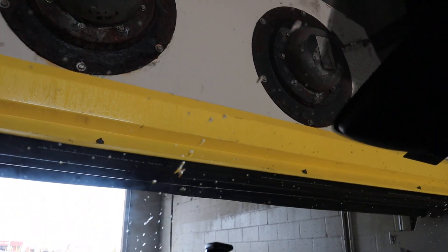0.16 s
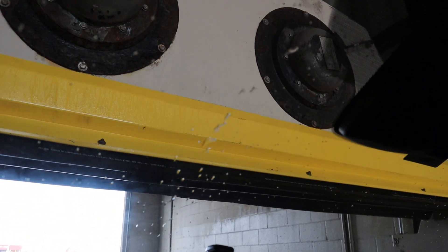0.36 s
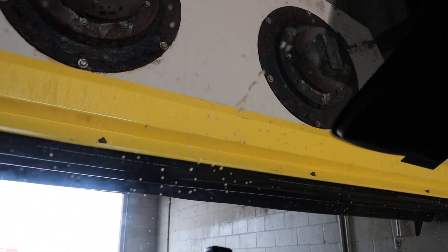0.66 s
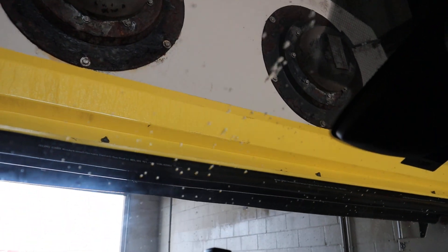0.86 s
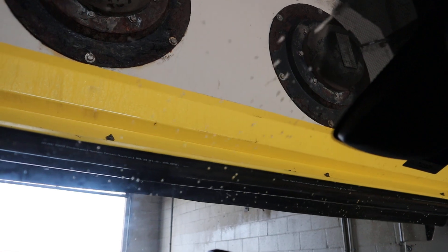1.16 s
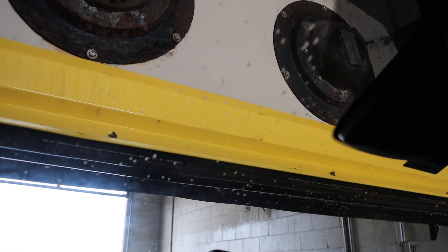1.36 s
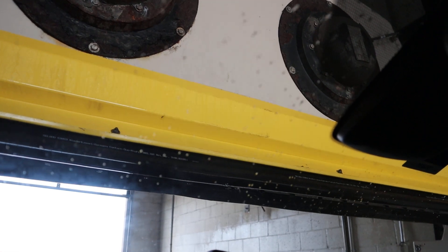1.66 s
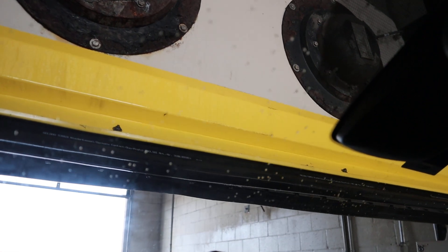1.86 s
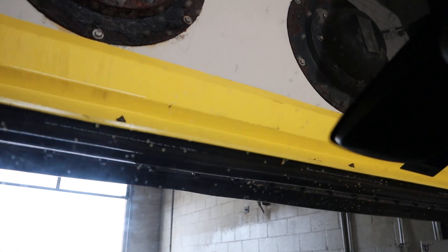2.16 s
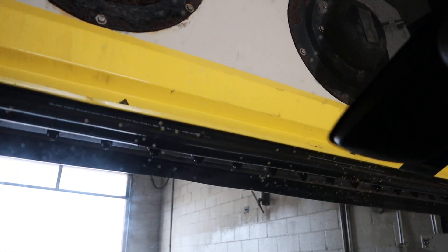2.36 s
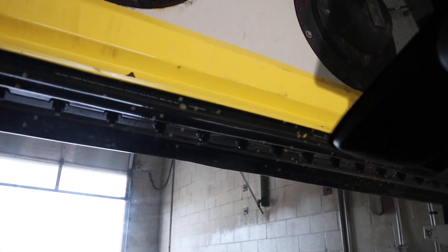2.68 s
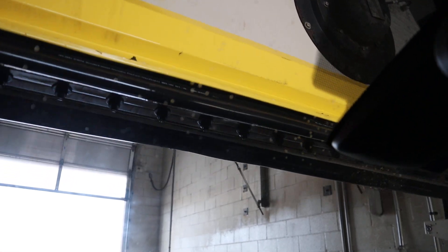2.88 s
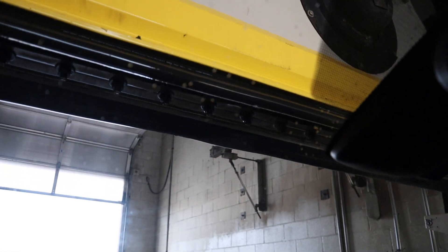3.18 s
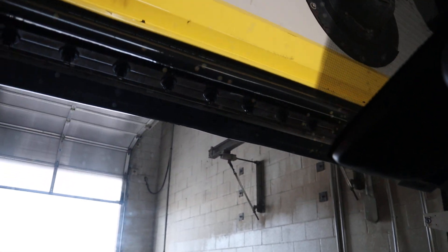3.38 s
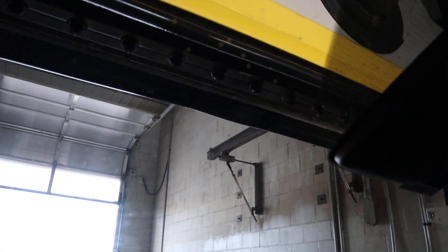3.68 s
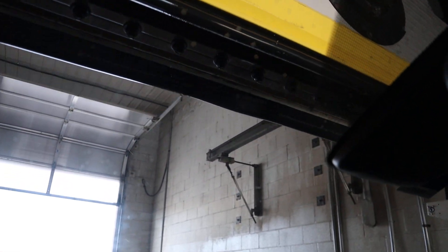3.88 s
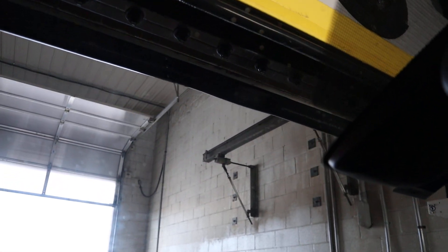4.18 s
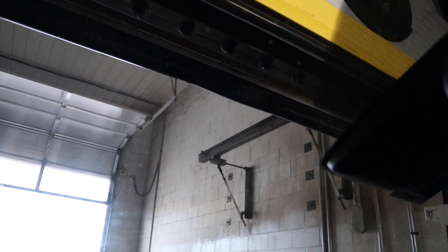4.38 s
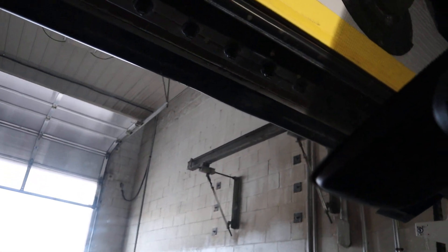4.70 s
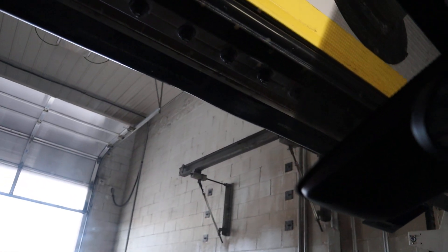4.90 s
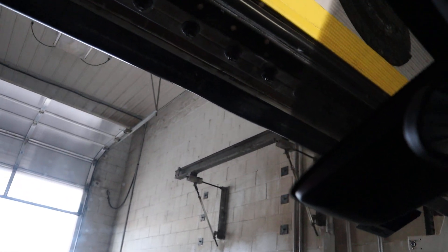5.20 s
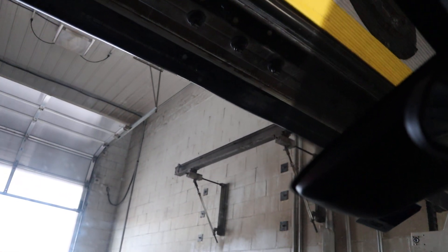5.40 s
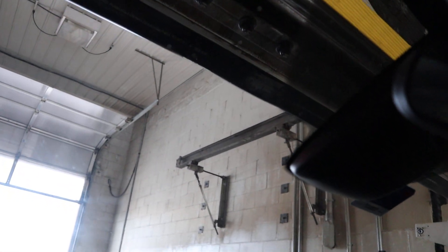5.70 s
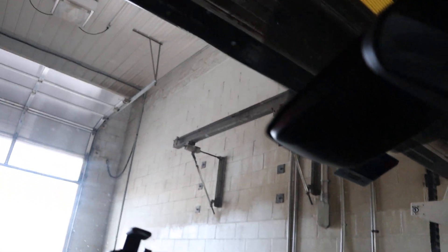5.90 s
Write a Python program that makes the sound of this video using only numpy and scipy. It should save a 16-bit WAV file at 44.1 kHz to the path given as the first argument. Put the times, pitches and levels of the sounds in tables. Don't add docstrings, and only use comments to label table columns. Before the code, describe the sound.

Inside a closed car, powerful wash dryer blowers roar steadily overhead, with low fluttering boom, a faint wavering fan whine and slowly brightening rush.

```python
import sys
import numpy as np
from scipy import signal
from scipy.io import wavfile
from scipy.ndimage import uniform_filter1d

SR = 44100
rng = np.random.default_rng(int(sys.argv[2]) if len(sys.argv) > 2 else 0)


def generate_wav(signal):
    frames = np.transpose(np.atleast_2d(signal))
    scaled = np.clip(frames, -1, 1) * 32767
    pcm = np.round(scaled).astype(np.int16)
    wavfile.write(sys.argv[1], SR, pcm)


def natural_amplitude(level_db):
    exponent = np.asarray(level_db, float) / 20
    return 10 ** exponent


N = 266800

# f/Hz, density/dB per Hz
ALIKE_SPECTRUM = [(18, -58), (32, -42), (90, -30), (160, -29.5), (210, -39), (420, -41.5), (660, -46.5),
                  (1400, -52.5), (2000, -56.5), (2700, -64), (3600, -66), (5500, -77), (7700, -82.5),
                  (13300, -99)]
# f/Hz, density/dB per Hz
OPPOSED_SPECTRUM = [(20, -90.5), (62, -80), (100, -60), (165, -52), (205, -56), (330, -56), (500, -53),
                    (1100, -52.5), (1700, -52.5), (2500, -54.5), (4000, -61.5), (5000, -66.5), (9000, -78),
                    (13300, -98)]
# f/Hz, width/Hz, level/dB
CABIN_MODES = [(45, 13, 3.5), (68.4, 14, 5.5), (122, 45, 5), (169.3, 19, 4), (345, 66, 6), (515, 80, 2),
               (596, 23, 3)]
# f/Hz, width/Hz, level/dB
SIDE_MODES = [(235, 25, 6.5), (280, 50, 11), (540, 70, 5), (745, 60, 2), (940, 90, 0.5), (1100, 110, 2),
              (1400, 60, 0), (1620, 200, 2), (2250, 120, -4)]
# f/Hz, in-step share/1 (+ louder left), quarter-turn share/1 (+ earlier left)
PORT_LINK = [(120, .02, .01), (220, .3, .01), (270, -.1, .01), (420, -.15, .05), (560, .3, -.1),
             (900, -0.18, .3), (1200, 0.32, .15), (1800, 0.23, .25), (2500, .1, .2), (4000, .01, .01),
             (5000, 0.33, -.1), (8000, .1, .01)]
# f/Hz, level/dB
PORT_DULLING = [(8000, -3.7), (8700, -2), (11500, 3), (12300, -1.5), (13300, -5.5)]
# f/Hz, level/dB
ALIKE_DULLING = [(8000, -.3), (9300, -2.6), (10500, -4.8), (11500, -4.4), (13000, -2.5)]
# t/s, travel/1
NOZZLE_TRAVEL = [
    (0, 0),
    (.9, 0),
    (1.8, 0.24),
    (2.6, 0.32),
    (3.4, 0.27),
    (4.4, 0.61),
    (5.2, 0.83),
    (6.05, 1.05),
]
LAYER_HZ = [130, 400, 1300, 4500]
LAYER_TRAVEL_DB = [-1, -1.1, 5, 1.5]
LAYER_GUST_SHARE = [0.79, .25, 0.1, .05]
# t/s, length/s, f/Hz, width/Hz, level/dB
PANEL_PASSES = [(.1, .5, 580, 20, 9), (.15, .4, 500, 60, 3), (.25, .6, 950, 130, 0.5),
                (.7, 0.55, 1000, 90, 2), (1.7, 0.8, 1400, 170, 0), (2.55, 0.65, 578, 20, 4),
                (3.1, .6, 520, 90, -4.5), (3.4, .5, 1410, 140, 4), (3.6, .4, 65, 25, 2.5),
                (4.4, 0.75, 70, 23, 2.5), (4.4, .3, 600, 15, 2), (4.5, .5, 474, 110, 1),
                (4.75, 0.5, 384, 79, 2), (5.38, 0.87, 512, 58, 5.5), (5.75, 0.42, 175, 28, 4.5),
                (5.95, 0.91, 1100, 160, 1), (5.95, 0.57, 280, 62, 8.5)]
# t/s, f/Hz, level/dB
GUSTS = [(.03, 113, -11), (.2, 122, -10.5), (.29, 123, -10), (.53, 125, -11.5), (.86, 122, -9.5),
         (1.04, 122, -16), (1.23, 109.8, -11), (1.51, 117, -13.5), (1.74, 121.5, -18), (1.87, 116.4, -18.5),
         (2.09, 116.5, -6.5), (2.22, 114.2, -10.5), (2.5, 107.9, -13.5), (2.91, 115.6, -18.5),
         (3.22, 123.4, -16), (3.44, 107.5, -16), (3.72, 116, -13), (3.89, 110, -12), (4.12, 115, -15.5),
         (4.4, 118.3, -15.5), (4.52, 123, -11.5), (4.87, 119.5, -7), (5.02, 120.5, -13.5),
         (5.14, 117.3, -15.5), (5.41, 122, -13.5), (5.63, 115.5, -14), (5.8, 119, -11.5),
         (5.92, 118.5, -17.5)]
# f/Hz, alike level/dB, opposed level/dB, in step with first fan at t/s
BLADE_TONES = [(586.61, -39, -51, 0), (586.9, -37, -49, 1.205), (588.4, -43, -55, .262),
               (586.72, -42, -52, 1.242), (587.22, -46, -62, 1.434), (586.13, -47.5, -63, .642)]
# f/Hz, alike level/dB, opposed level/dB, in step with first fan at t/s
SECOND_TONES = [(1176.71, -51, -60, 0), (1176.32, -52.5, -57, 1.699), (1173.57, -52, -68, .165),
                (1173.12, -53.5, -63, .086), (1174.08, -55.5, -70, .282), (1176.05, -59, -62, .49)]
# f/Hz, alike level/dB, opposed level/dB, in step with first fan at t/s
THIRD_TONES = [(1760.35, -55, -52.5, 0), (1759.73, -56.5, -58.5, 1.544), (1761, -60, -55.5, .044),
               (1760.16, -57, -54.5, 2.31), (1759.49, -61, -58, .762), (1762.18, -59, -62, .422)]
WHINE_TRAVEL_DB = [-0.1, 11.5, 0]
# f/Hz, level/dB, left over right/dB
MOTOR_TONES = [
    (117.7, -34, .1),
    (235.3, -35, 1.5),
    (1292, -57, 3),
    (2348, -59, 4),
]

RUSH_LEVEL_DB, OPPOSED_TRIM_DB = -15, -1.5
AIR_HZ, AIR_DB_PER_S, AIR_ALIKE_DB_PER_S = (6540, 10300), 0.2, 1.1
GUST_S, GUST_LIFT_DB, CALM_DB = 0.042, 4, -19.5
WHINE_DB, LEAD_RAD = [-0.6, -5.5, -1], [-1.0, .2, .3]
DUCK_S, DUCK_DB, DUCK_FALL_S, DUCK_BACK_S = 2.245, -2, .012, 1.02


def evened(x):
    return x / np.sqrt(np.mean(x ** 2) + 1e-20)


def read(points, hz, column=1):
    table = np.transpose(points)
    return np.interp(np.log(hz + 1), np.log(table[0] + 1), table[column])


def bumps_db(modes, hz):
    return sum(db / (1 + (2 * (hz - f) / width) ** 2) for f, width, db in modes)


def nozzle_travel(t):
    return np.interp(t, *np.transpose(NOZZLE_TRAVEL))


def gust_shape(t, s):
    return np.exp(-((t - s) / GUST_S) ** 2)


def drift(rate_hz):
    t = np.arange(N) / SR
    rates = rate_hz * np.geomspace(.1, 1, 12)
    return evened(sum(np.sin(2 * np.pi * (f * t + rng.random())) for f in rates))


def ports(x, lean_db):
    return np.array([x * natural_amplitude(lean_db / 2), x * natural_amplitude(-lean_db / 2)])


def rush_swell_db(t, hz):
    gust_db = 0
    for s, _, db in GUSTS:
        lift_db = GUST_LIFT_DB * np.tanh(max(db - CALM_DB, 0) / 8)
        gust_db = gust_db + lift_db * gust_shape(t, s)
    swell_db = np.outer(np.interp(hz, AIR_HZ, [0, 1]), AIR_DB_PER_S * (t - t.mean()))
    one_layer_each = np.eye(len(LAYER_HZ))
    for row, travel_db, gust_share in zip(one_layer_each, LAYER_TRAVEL_DB, LAYER_GUST_SHARE):
        blend = np.interp(np.log(hz + 1), np.log(LAYER_HZ), row)
        swell_db = swell_db + np.outer(blend, travel_db * nozzle_travel(t) + gust_share * gust_db)
    for s, length, f, width, db in PANEL_PASSES:
        passing = np.exp(-(2 * (t - s) / length) ** 2)
        swell_db = swell_db + np.outer(bumps_db([(f, width, db)], hz), passing)
    return swell_db


def rush(patchy_db=1.02):
    size, hop = 2048, 512
    frames, hz = N // hop + 5, np.fft.rfftfreq(size, 1 / SR)
    t = np.arange(frames) * hop / SR
    a, b, c, d, patches = rng.standard_normal((frames, len(hz), 5)).T
    patches = uniform_filter1d(patches, size=4, axis=0)
    patches = evened(uniform_filter1d(patches, size=50, axis=1))

    link = (read(PORT_LINK, hz, column=1) + 1j * read(PORT_LINK, hz, column=2))[:, None]
    alike = a + 1j * b
    own_share = np.sqrt(np.clip(1 - abs(link) ** 2, 0, 1))
    opposed = link * alike + own_share * (c + 1j * d)

    alike_db = read(ALIKE_SPECTRUM, hz) + read(ALIKE_DULLING, hz) + bumps_db(CABIN_MODES, hz)
    opening_db = AIR_ALIKE_DB_PER_S * np.minimum(t - 2.8, 0)
    alike = alike * natural_amplitude(alike_db[:, None] + np.outer(np.interp(hz, AIR_HZ, [0, 1]), opening_db))
    opposed_db = read(OPPOSED_SPECTRUM, hz) + bumps_db(SIDE_MODES, hz) + OPPOSED_TRIM_DB
    opposed = opposed * natural_amplitude(opposed_db)[:, None]

    change_db = rush_swell_db(t, hz) + read(PORT_DULLING, hz)[:, None] + patchy_db * patches
    spectra = np.array([alike + opposed, alike - opposed]) * natural_amplitude(change_db)
    sound = signal.istft(spectra, nperseg=size, noverlap=size - hop)[1][:, :N]
    return natural_amplitude(RUSH_LEVEL_DB) * evened(sound)


def boom(under_db=-6):
    t, rings = np.arange(N) / SR, np.zeros(N)
    for s, hz, db in GUSTS:
        tone = np.sin(2 * np.pi * (hz * t + rng.random()))
        rings += natural_amplitude(db + under_db) * gust_shape(t, s) * tone
    return ports(np.sqrt(2) * rings, .05)


def fans(flutter_db=2.17):
    t, out = np.arange(N) / SR, np.zeros((2, N))
    multiples = (BLADE_TONES, SECOND_TONES, THIRD_TONES)
    for table, trim_db, rise_db, lead in zip(multiples, WHINE_DB, WHINE_TRAVEL_DB, LEAD_RAD):
        whine_db = trim_db + rise_db * nozzle_travel(t) + flutter_db * drift(9)
        flutter = np.sqrt(2) * natural_amplitude(whine_db)
        for hz, alike_db, opposed_db, s in table:
            turn = 2 * np.pi * (table[0][0] * s + hz * (t - s))
            alike = natural_amplitude(alike_db) * np.sin(turn)
            opposed = natural_amplitude(opposed_db) * np.sin(turn + lead)
            out += flutter * np.array([alike + opposed, alike - opposed])
    return out


def motors():
    t, out = np.arange(N) / SR, np.zeros((2, N))
    for hz, db, lean_db in MOTOR_TONES:
        level = np.sqrt(2) * natural_amplitude(db + 2.9 * drift(0.67))
        out += ports(level * np.sin(2 * np.pi * hz * t), lean_db)
    return out


def scene():
    return rush() + boom() + fans() + motors()


def low_pass(x):
    return signal.sosfilt(signal.butter(12, 13320, fs=SR, output="sos"), x)


def record(dry):
    power_db = 10 * np.log10(abs(uniform_filter1d((dry ** 2).mean(0), size=600)) + 1e-12)
    fall_db = np.arange(N) * 58.0 / SR
    held_db = np.maximum.accumulate(power_db + fall_db) - fall_db
    over_db = np.maximum(held_db + 12.5, 0)
    since = np.maximum(np.arange(N) / SR - DUCK_S, 0)
    duck_db = DUCK_DB * (1 - np.exp(-since / DUCK_FALL_S)) * np.exp(-since / DUCK_BACK_S)
    mix = dry * natural_amplitude(duck_db - 0.25 * uniform_filter1d(over_db, size=200))
    return low_pass(mix)


dry = scene()
out = record(dry)
generate_wav(out)
```